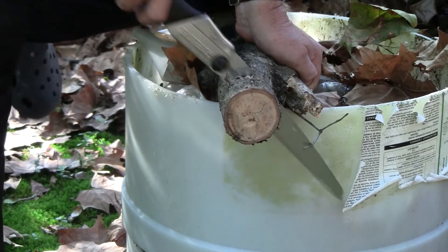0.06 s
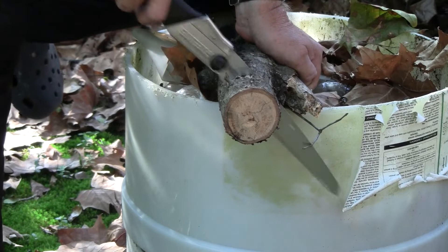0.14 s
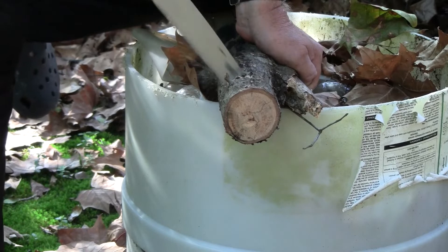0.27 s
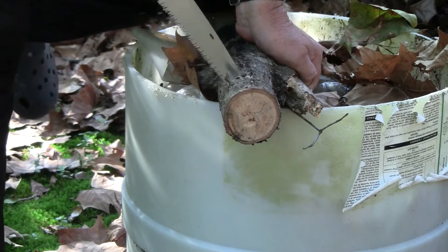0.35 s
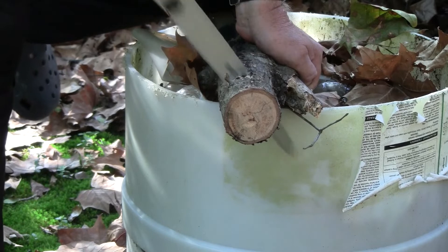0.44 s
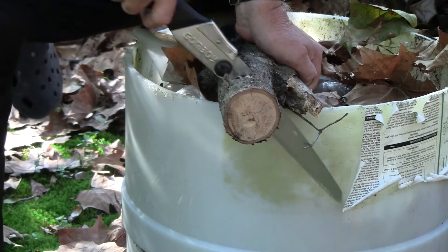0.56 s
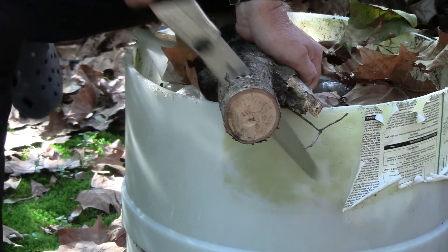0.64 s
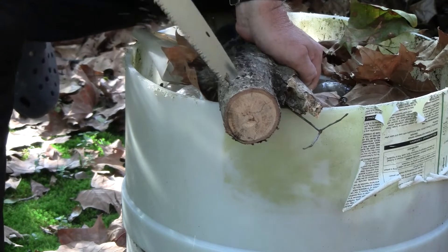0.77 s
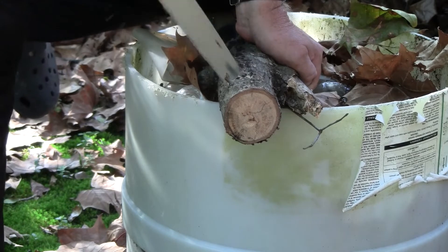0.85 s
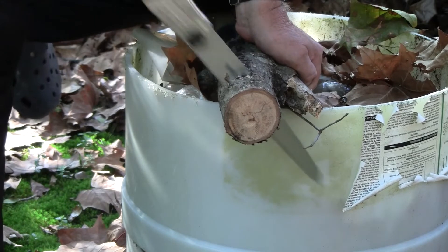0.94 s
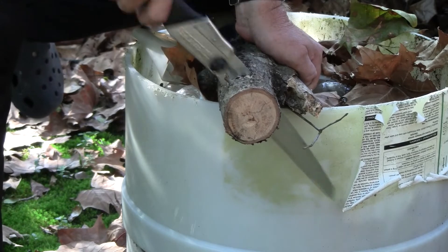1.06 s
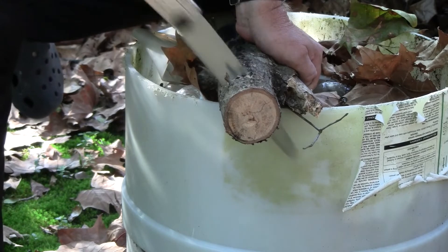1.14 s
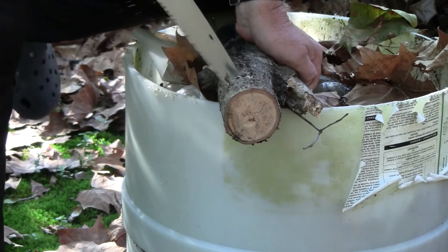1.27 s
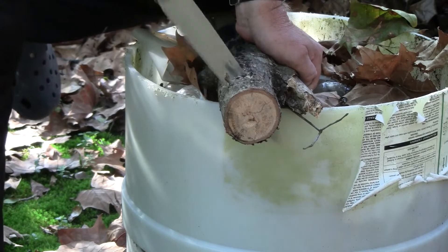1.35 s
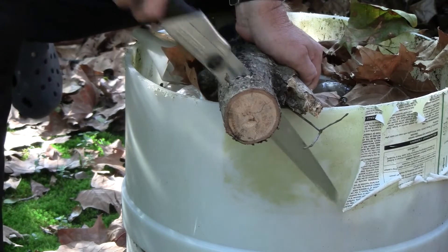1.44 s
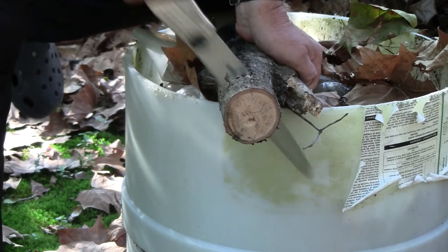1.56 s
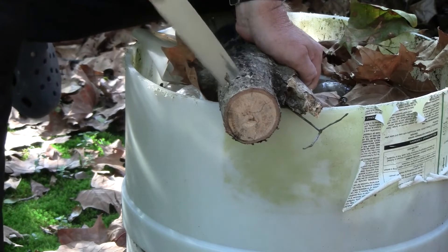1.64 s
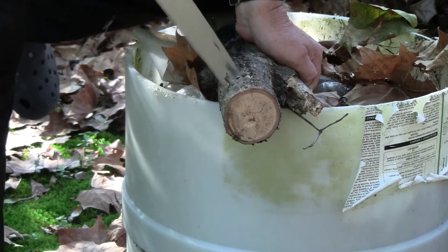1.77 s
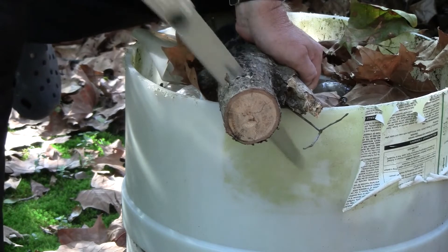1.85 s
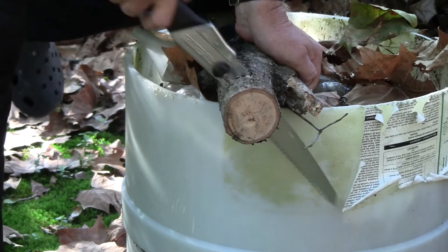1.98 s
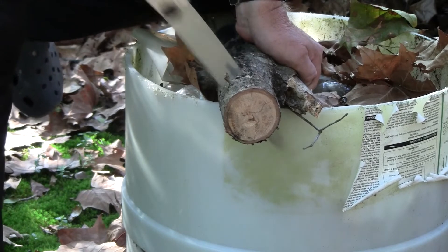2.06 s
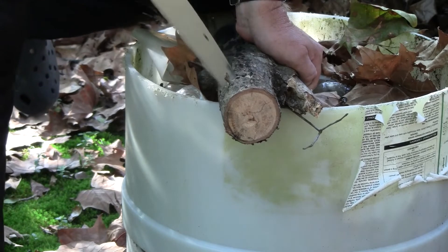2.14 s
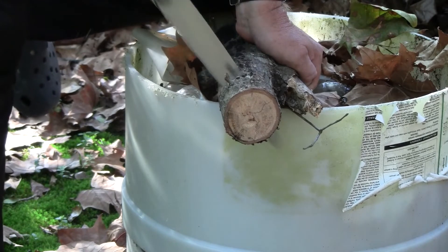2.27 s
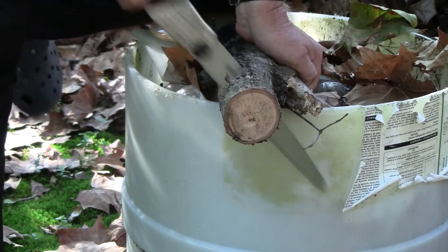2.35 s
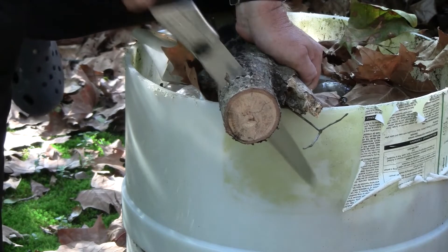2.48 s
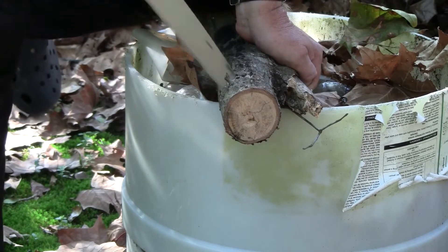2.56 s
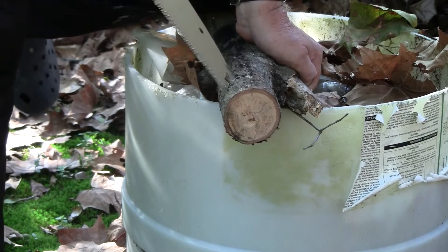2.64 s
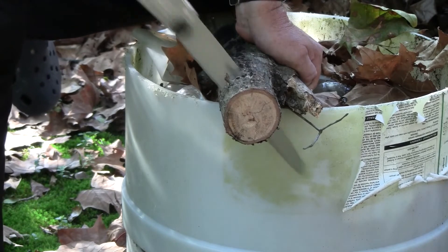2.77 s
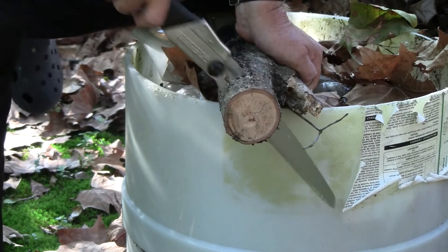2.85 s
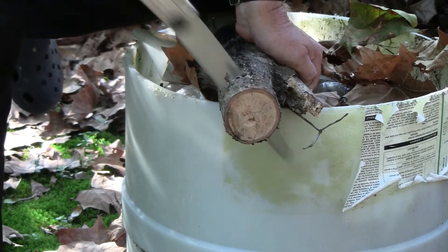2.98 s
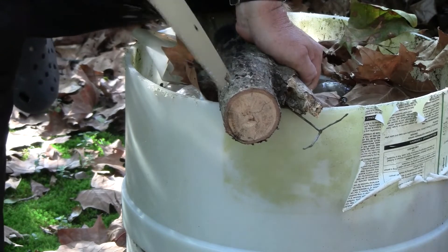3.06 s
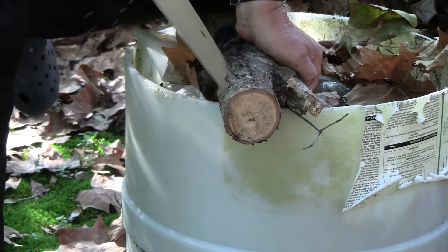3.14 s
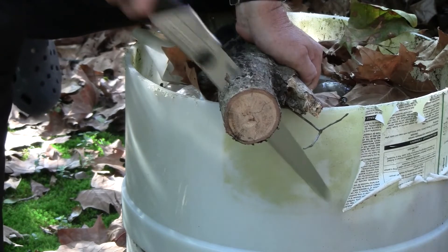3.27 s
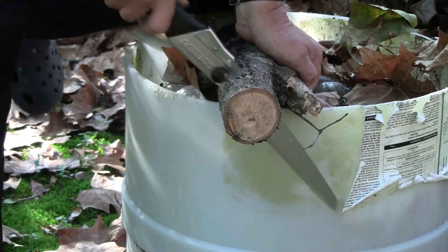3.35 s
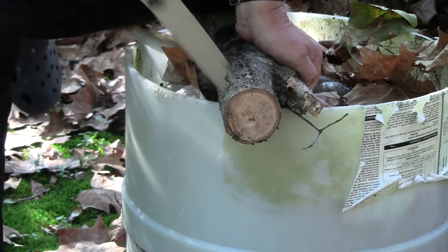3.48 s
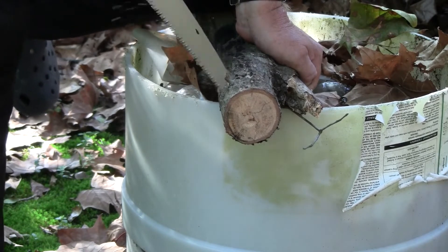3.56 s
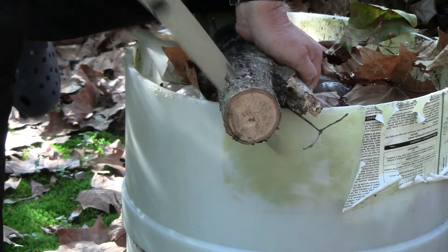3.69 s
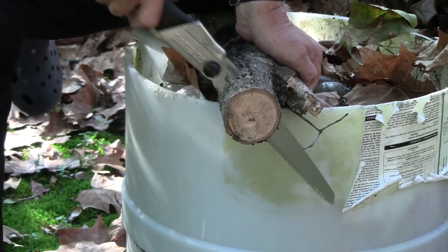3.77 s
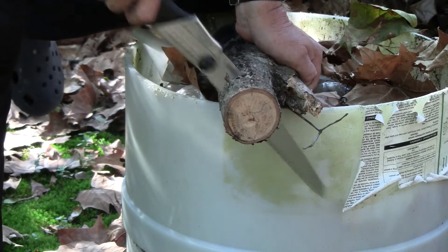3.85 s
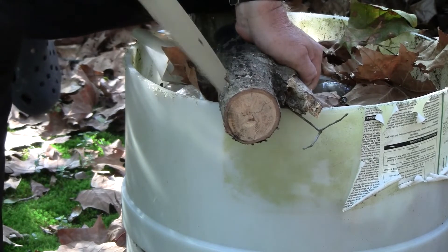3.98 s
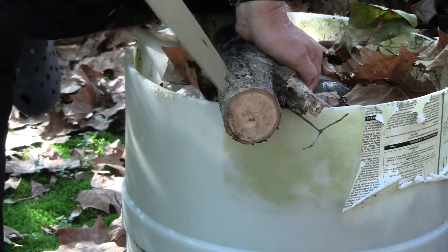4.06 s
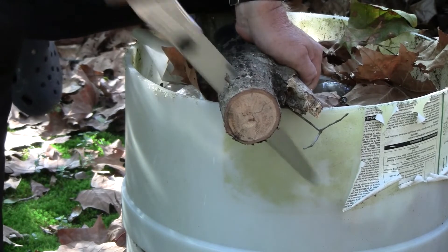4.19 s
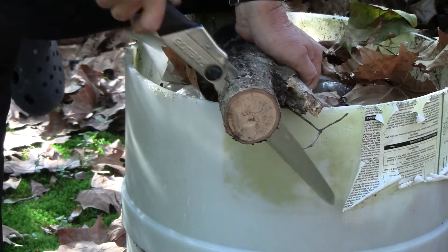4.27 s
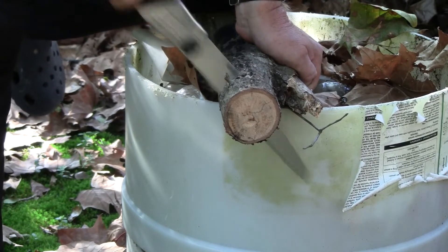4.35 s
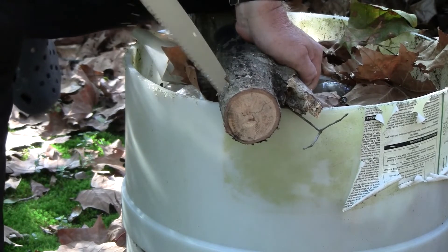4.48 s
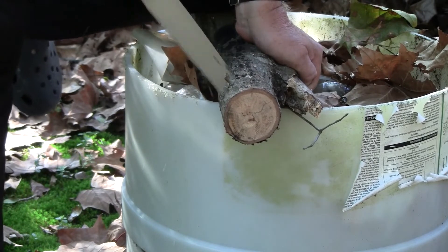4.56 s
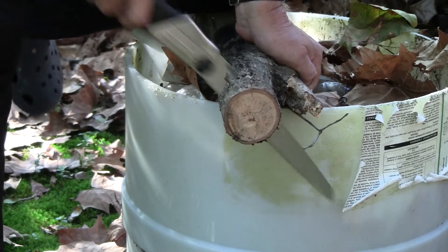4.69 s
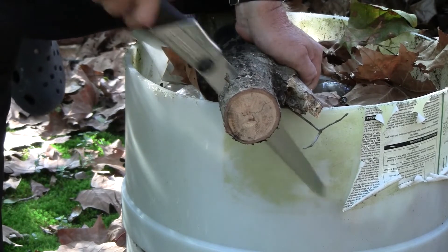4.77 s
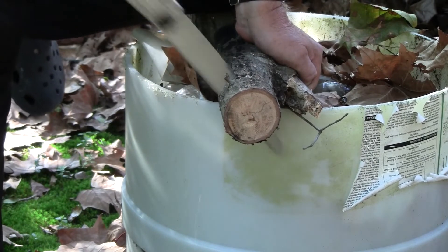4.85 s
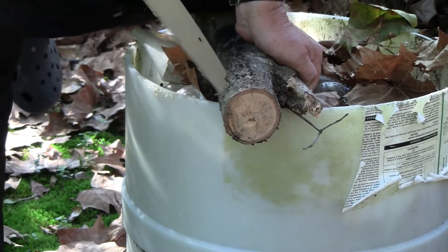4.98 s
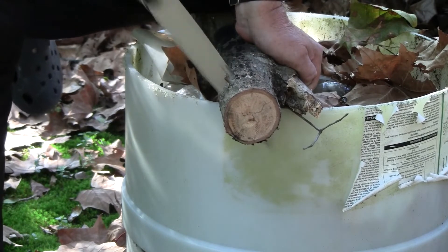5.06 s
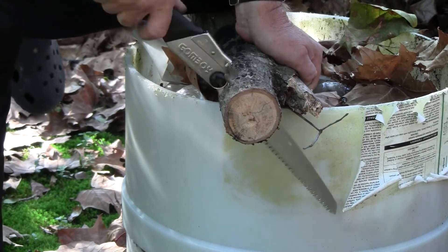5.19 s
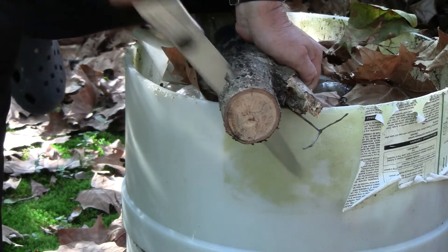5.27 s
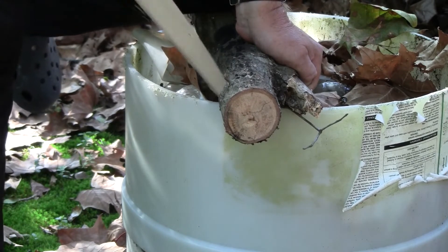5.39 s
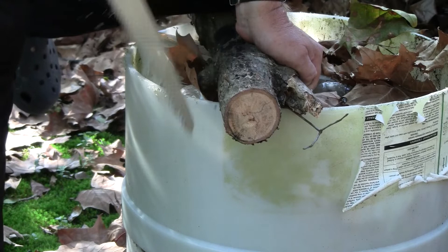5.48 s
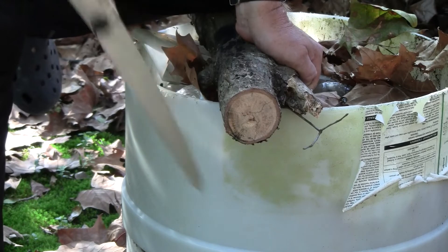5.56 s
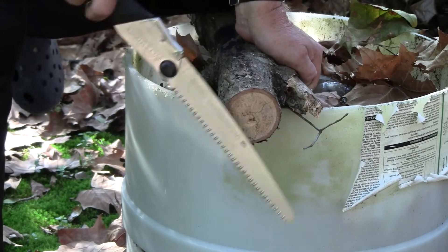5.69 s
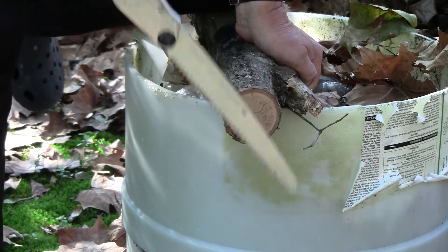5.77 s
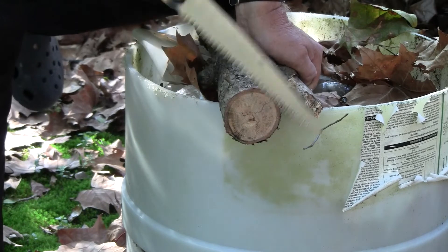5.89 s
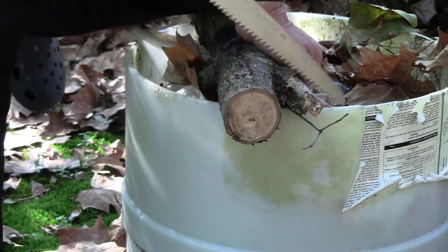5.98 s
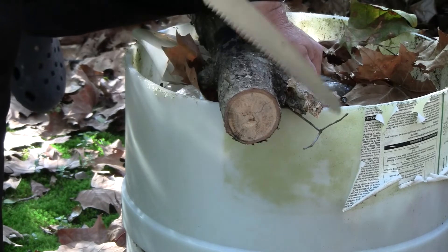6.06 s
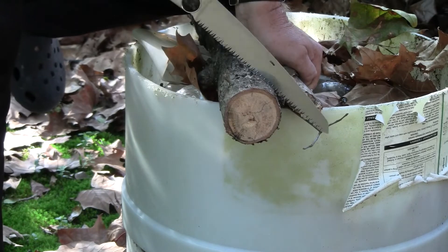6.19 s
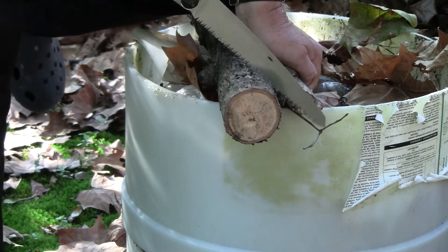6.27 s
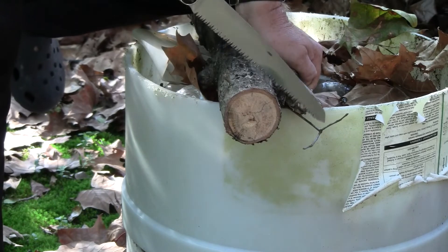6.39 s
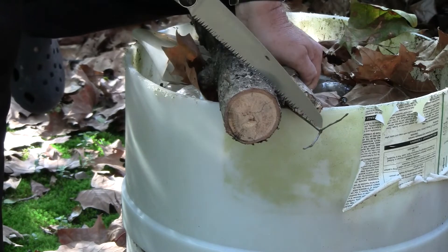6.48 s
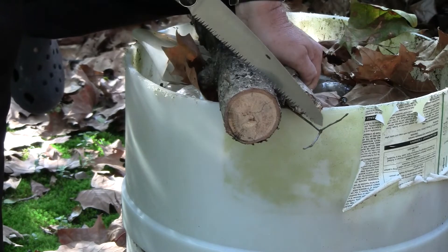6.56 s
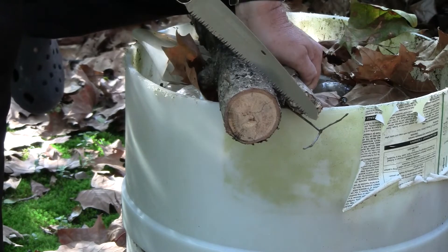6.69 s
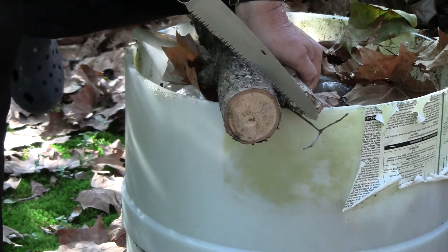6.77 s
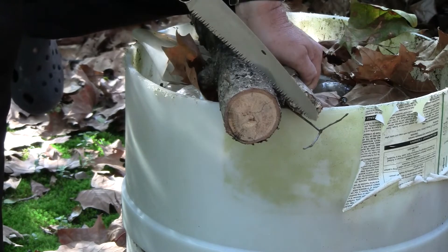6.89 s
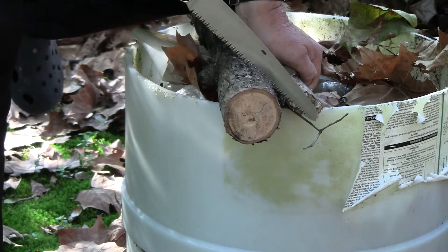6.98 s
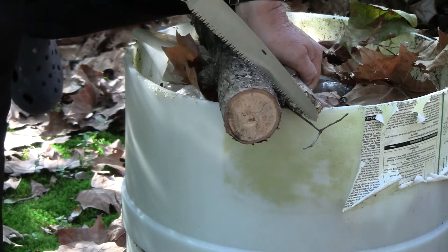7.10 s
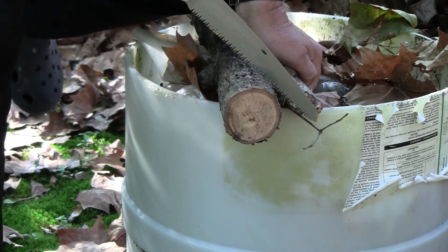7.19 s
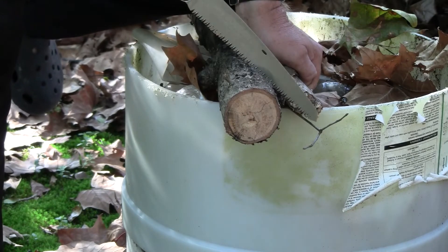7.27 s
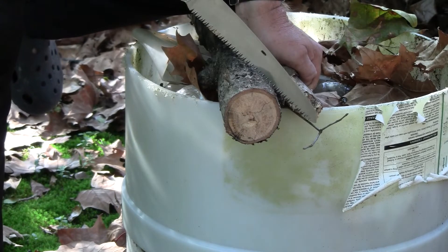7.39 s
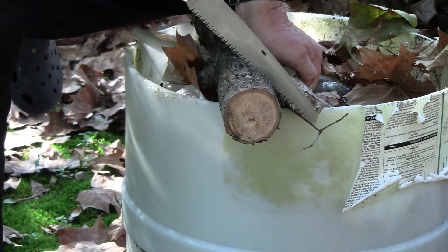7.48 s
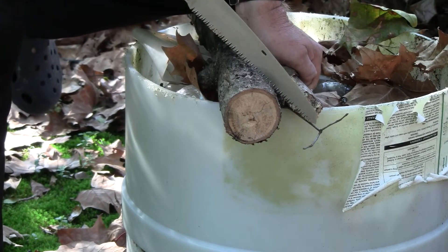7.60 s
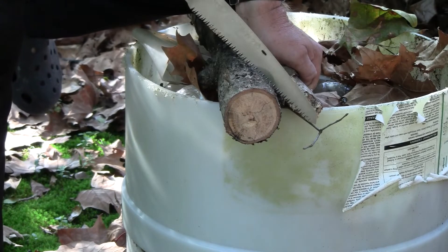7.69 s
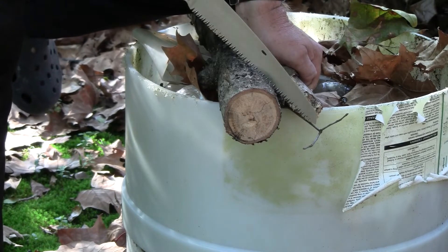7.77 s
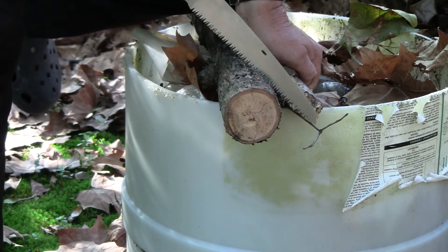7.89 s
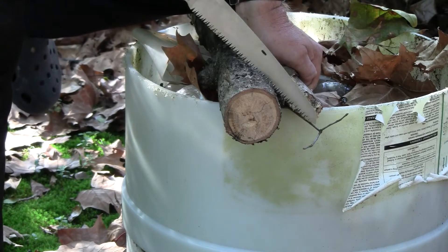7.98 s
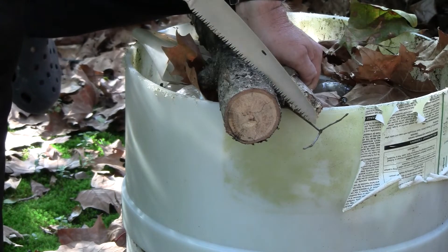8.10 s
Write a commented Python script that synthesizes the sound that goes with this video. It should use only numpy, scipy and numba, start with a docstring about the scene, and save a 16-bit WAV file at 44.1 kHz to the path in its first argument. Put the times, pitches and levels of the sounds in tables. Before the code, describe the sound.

Brisk sawing of small wood, hollow juddering pushes and bright tearing pulls, stops after several seconds, followed by ticks and light knocks outdoors.

```python
"""Pull saw in a small branch

A folding saw cuts a branch held across a plastic bucket in a quiet yard, about two strokes in and out a second.
On the push the teeth skid and shake branch and bucket, heard as resonances driven by tooth impulses; on the pull
they tear fibres, heard as coloured noise, and the free end of the blade rings in its own modes.
The saw is then lifted out, ticks a few times and is set down on the bark for the next cut, among stirring leaves."""
import sys
import numpy as np
from scipy import signal
from scipy.fft import rfft, irfft, next_fast_len
from scipy.io import wavfile
from scipy.ndimage import uniform_filter1d
from numba import njit

SR = 44100
rng = np.random.default_rng(int(sys.argv[2]) if len(sys.argv) > 2 else 0)


def unload_audio(sound):
    """Save the sound as a 16-bit wav file, at the path given as the first command line argument."""
    columns = np.transpose(np.atleast_2d(sound))
    # keep every value between -1 and 1, then stretch to whole-number steps
    steps = np.round(np.clip(columns, -1, 1) * 32767)
    wavfile.write(sys.argv[1], SR, steps.astype(np.int16))


N = 358953
TIME = np.arange(N) / SR
LAST_STROKE_END_S = 5.48


def undb(db):
    """Amplitude ratio of a level: twenty decibels are a factor of ten."""
    return 10 ** (np.asarray(db) / 20)


def unit(x):
    """Normalisation to an rms of 1."""
    return x / np.sqrt(np.mean(x ** 2))


def colour(x, points):
    """Linear filtering in the frequency domain: gain through (hz, level_db) points on a log-frequency axis."""
    hz, db = np.transpose(points)
    size = next_fast_len(N + 4096)
    f = np.maximum(np.fft.rfftfreq(size, 1 / SR), 1)
    gain = undb(np.interp(np.log(f), np.log(hz), db))
    return irfft(rfft(x, size) * gain, size)[..., :N]


def walk(rate):
    """Slow random modulation of rms 1: straight lines between Gaussian values, rate of them a second."""
    knots = rng.standard_normal(8192)
    return unit(np.interp(TIME * rate, np.arange(len(knots)), knots))


@njit
def svf(x, hz, width):
    """Second-order resonance as a state-variable band-pass: moving centre, gain 1 there."""
    y, band, low = np.empty(len(x)), 0., 0.
    for i in range(len(x)):
        g, damping = np.tan(np.pi * hz[i] / SR), width / hz[i]
        v = (band + g * (x[i] + 1e-18 - low)) / (1 + g * (g + damping))
        band, low = 2 * v - band, low + 2 * g * v
        y[i] = damping * v
    return y


def resonate(x, hz, width):
    """A single mode of vibration, of fixed or moving frequency."""
    return svf(x, np.zeros(N) + hz, float(width))


def yard():
    """Diffuse ambience: shared and opposed noise make a wide outdoor rush, with insects far off."""
    # spectrum of the rush: hz, level_db
    rush_spectrum = [(18, -46), (30, -26), (120, -1), (161, -3.5), (301, -3.5), (413, -7), (471, -7),
                     (612, -8), (1060, -13), (1570, -18), (4150, -26), (6480, -29), (7990, -31),
                     (15800, -31.5)]
    mid, side = colour(rng.standard_normal((2, N)), rush_spectrum)
    side = colour(side, [(100, -6.0), (600, 3.5), (3000, -2.5), (10000, -3)]) / np.std(mid)
    # after 5.7 s the rush sinks by 0.94 dB a second
    level_db = -52.5 - 0.94 * np.maximum(TIME - 5.7, 0) + 0.3 * walk(15)
    return (unit(mid) + side * [[1], [-1]]) * undb(level_db) + insects()


def insects():
    """Narrow-band noise: two cascaded resonances, independent in each channel."""
    def one_side():
        return unit(resonate(resonate(rng.standard_normal(N), 8100, 1000), 7760, 1000))

    return np.array([one_side(), one_side()]) * undb(-67.5 + 1.4 * walk(20))


def arm():
    """Reciprocating motion: speed and force of the arm set rasp, shaking, ring, rocking and judder pitch."""
    # one push and pull of the arm: push_start_s, pull_start_s, push_force_db, pull_force_db,
    # judder_hz, push_ring_db, pull_ring_db, rocking_db (levels are relative)
    strokes = [(-.08, 0.138, 2, 1, 333, -3, -0.5, -13), (.381, 0.593, 1.5, 2.5, 330, -1.5, 2, 5),
               (.817, 1.061, 0, 1.5, 325, -2, 2.5, -5), (1.284, 1.522, -1.5, .5, 327, -1.5, 3, 6),
               (1.748, 1.982, 0, 0.5, 290, -2, -1, 5), (2.218, 2.439, -1.5, .5, 363, 1.5, -1, 2),
               (2.676, 2.903, -1.5, 1, 309.7, -1.5, 2.5, -6), (3.13, 3.365, 0, -1.5, 372.3, -3, 3, 7),
               (3.603, 3.831, -1, -2.5, 395, -1, 2.5, -7), (4.064, 4.288, -1, -4, 400.5, -10, -1.5, 6.5),
               (4.529, 4.759, 0, -2, 385, -5, 3.5, 3), (4.991, 5.216, -1, 1.5, 319.5, -1.5, 4, 4)]
    push_s, pull_s, push_db, pull_db, judder_hz, push_ring_db, pull_ring_db, rock_db = np.transpose(strokes)
    turns = np.append(np.column_stack([push_s, pull_s]), LAST_STROKE_END_S)
    phase = np.interp(TIME, turns, np.arange(len(turns)))
    stroke = np.minimum(phase // 2, len(strokes) - 1).astype(int)

    def by_direction(on_push, on_pull):
        """Direction-dependent quantity, blended at the turn."""
        return uniform_filter1d(np.where(phase % 2 < 1, on_push, on_pull) * 1., SR // 20)

    # the lag shifts top speed away from the middle, in shares of a stroke
    swing = phase - by_direction(0.07, -0.0066) * np.abs(np.sin(np.pi * phase))
    turn_speed = 0.18  # share of full speed that still scrapes at each turn
    speed = turn_speed + (1 - turn_speed) * np.abs(np.sin(np.pi * swing))
    force_db = by_direction(push_db[stroke], pull_db[stroke])
    cutting = np.clip((LAST_STROKE_END_S - TIME) / 0.067, 0, 1)  # the last pull lifts out of the kerf
    # the rasp is loudest on the cutting pull and takes a share of the stroke's force
    rasp_db = by_direction(-37, -34) + .3 * force_db
    rasp = cutting * speed ** 1.684 * undb(rasp_db)
    # the wood shakes most on the skidding push, and more as the handle comes near
    nearness_db = -4 * np.cos(np.pi * phase) / 2
    shake_db = by_direction(-22, -28.5) + force_db + nearness_db
    shake = cutting * speed ** 1.294 * undb(shake_db)
    ringing = undb(by_direction(push_ring_db[stroke], pull_ring_db[stroke]))
    rock = undb(rock_db[stroke] - force_db)
    return phase, rasp, shake, ringing, rock, judder_hz[stroke]


def teeth(speed, nominal_rate_hz=240, jitter=.3, scatter_db=2.0, bite_s=0.0022):
    """Impulsive excitation: teeth pass at a rate set by blade speed, strike unevenly and tear for a moment."""
    rate_hz = nominal_rate_hz * (.3 + .7 * speed) * np.exp(jitter * walk(250))
    count = np.floor(np.cumsum(rate_hz) / SR)
    strikes = np.diff(count, prepend=0) * undb(scatter_db * np.clip(walk(400), -2, 1))
    bite = signal.lfilter([1], [1, -np.exp(-1 / (bite_s * SR))], strikes)
    return unit(strikes), unit(bite)


def tear_fibres(bite, rasp):
    """Modulated noise: each bite tears fibres, unevenly with harder and softer grain."""
    grain = undb(1.1 * walk(70))
    torn = rng.standard_normal((2, N)) * (1.54 + bite) * grain * undb(1.0 * walk(900))
    return unit(torn) * rasp


def knocks(times, db, contact_s):
    """Blunt impact: force rises to its peak at the contact time, then dies; db sets the pulse energy."""
    hits, t = np.zeros(N), TIME[:SR // 50]
    hits[(times * SR).astype(int)] = undb(db)
    push = t * np.exp(-t / contact_s)
    return signal.fftconvolve(hits, push / np.linalg.norm(push))[:N]


def catches():
    """Impulsive contact: a tooth catches hard and jolts the branch."""
    # hard catches: start_s, level_db (relative)
    catch_list = [(0.047, -9.5), (0.48, -10), (0.981, -15), (1.354, -13.5), (1.581, -15), (1.96, -9.5),
                  (2.028, -18.5), (2.271, -17), (2.753, -12.5), (3.223, -17.5), (3.284, -19), (3.35, -12.5),
                  (3.393, -17), (3.724, -12.5), (3.758, -15), (4.18, -11.5), (4.205, -14), (5.206, -15.5)]
    return knocks(*np.transpose(catch_list), contact_s=0.00015)


def snags(shake):
    """Random impulses: teeth snag at chance moments, harder where the wood shakes more."""
    per_second, level_db, spread_db = 13, 1.5, 4
    chance = rng.random((int(per_second * LAST_STROKE_END_S), 2))
    db = level_db + spread_db * (2 * chance[:, 1] - 1)
    return knocks(chance[:, 0] * LAST_STROKE_END_S, db, contact_s=0.00014) * shake


def body(push, pull):
    """Modal response of branch and bucket: the direction of the force decides which modes speak."""
    # modes of branch and bucket: pitch_hz, width_hz, push_level_db, pull_level_db (relative)
    wood_modes = [(83.6, 23, -27, -5), (117, 24, -13.5, 3), (150, 29, -5.5, -2.5), (187.9, 13, 1.5, -2.5),
                  (250.6, 19.5, -2.5, 2), (271.8, 14.2, 0.5, -1), (329.8, 35.5, 1.5, -8.5),
                  (360.4, 18.3, 2.5, -3.5), (407.6, 28.7, 1, 2.5), (486.6, 18.5, -5, -6),
                  (520.6, 28, -8, -5.5), (616, 29, -7.5, -5.5), (694, 30, -1.5, -3), (778.7, 24.5, -2, -5),
                  (859.5, 49, -4, -3.5), (995, 43, -7.5, -17), (1173, 150, -14, -28),
                  (1266, 37, -2.5, -7.5), (1386, 79, -12, -14.5), (1582, 45, -2.5, -5.5),
                  (1852, 78, -12.5, -22)]
    out = np.zeros(N)
    for k, (hz, width_hz, push_db, pull_db) in enumerate(wood_modes):
        drive = push * undb(push_db) + pull * undb(pull_db)
        out += (-1) ** k * resonate(drive, hz, width_hz)  # neighbours in opposite polarity
    return colour(out, [(35, -36), (62, -2.5), (105, 1.5), (1900, -7.5), (4000, -14)])


def shaken_wood(strikes, bite, shake, depth, pushing, rock, judder_hz):
    """Forced vibration: skidding teeth make the branch judder, and the pull rocks the bucket."""
    force = unit(strikes + 0.33 * bite * rng.standard_normal(N)) * shake * undb(14.0)
    pull_force = force * (1 - pushing)
    # the long lever at the start of a pull rocks the whole bucket
    rocking = resonate(pull_force * depth ** 1.7 * rock, 116, 49.4)
    jolts = (catches() + snags(shake)) * undb(22.0)
    skid = force * pushing + jolts
    judder = resonate(skid, judder_hz, 57) * undb(1.5)
    return body(skid + judder, (pull_force + rocking) * undb(3.0))


def blade(force, bend=1):
    """Free decay of steel modes: the blade rings on after each impulse; bending detunes it."""
    # the free end of the blade: pitch_hz, level_db (relative), t60_s
    steel_modes = [(2805, -18, .07), (4872, 0, .15), (5787, -4, .14), (7620, -16, .05), (8710, -23, .05),
                   (9620, -22, .09), (12769, -18, .08)]
    out = np.zeros(N)
    for hz, db, t60_s in steel_modes:
        width_hz = np.log(1000) / np.pi / t60_s
        out += undb(db) * resonate(force, hz * bend, width_hz)
    return out


def blade_ring(tearing, depth, ringing):
    """Contact damping: the blade rings while out of the kerf and is choked as the handle comes near."""
    free = np.clip((.8 - depth) / 0.54, 0, 1) * ringing * undb(1.05 * walk(11))
    leaving = np.clip((LAST_STROKE_END_S - TIME) / 0.14, 0, 1)  # the last pull lifts off and barely rings
    return blade(tearing * free * leaving, 1 + 0.0021 * walk(70)) * undb(26.0)


def span_chirp(tearing, depth, pushing):
    """Shortening resonator: the span from handle to wood rises in pitch with depth, mostly on the push."""
    wandering_depth = depth - .64 + 0.044 * walk(30)  # the contact shifts
    span_hz = 4870 + 4660 * np.maximum(wandering_depth, 0)
    contact_db = 5 * pushing + 4.0 * np.tanh(walk(45))
    contact = np.clip((depth - .4) / 0.28, 0, 1) * undb(contact_db)
    return resonate(tearing * contact, span_hz, 160) * undb(8.5)


def along_blade(x, depth, handle_s=.0031, tip_s=.0047, echo_db=-3.5):
    """Comb interference: waves return from handle and tip over changing lengths, so fine resonances slide."""
    from_handle = np.interp(TIME - handle_s * (1 - 0.392 * depth), TIME, x)
    from_tip = np.interp(TIME - tip_s * (1 + 0.1547 * depth), TIME, x)
    echo = undb(echo_db)
    return (x + echo * (from_handle - from_tip)) / np.sqrt(1 + 2 * echo ** 2)


def sawing():
    """Friction in the kerf excites rasp, shaking wood and ringing steel; gives direct and scattered sound."""
    # spectrum of tearing fibres: hz, level_db (relative)
    fibre_spectrum = [(400, -13), (900, 8), (1900, 6), (2400, 2.5), (3000, 3.5), (4200, -2.5), (5200, 4.5),
                      (6300, 4), (7000, 0.5), (9000, -3.5), (10200, 1.5), (11500, -4), (13000, 0.5),
                      (15800, -2.5)]
    phase, rasp, shake, ringing, rock, judder_hz = arm()
    depth = (1 - np.cos(np.pi * phase)) / 2  # 1 = in to the handle
    pushing = uniform_filter1d((phase % 2 < 1) * 1., SR // 50)
    strikes, bite = teeth(np.abs(np.sin(np.pi * phase)))
    tearing = tear_fibres(bite, rasp)
    hiss = colour(tearing, fibre_spectrum) * undb(1.5)
    wood = shaken_wood(strikes, bite, shake, depth, pushing, rock, judder_hz)
    ring = blade_ring(tearing[0], depth, ringing)
    chirp = span_chirp(tearing[0], depth, pushing)
    return wood + ring + chirp + along_blade(hiss[0], depth), along_blade(hiss[1], depth)


def blows(times, db, decay_s):
    """Exponential decay: short scrapes of dying noise, each with the energy that its db gives."""
    out, t = np.zeros(N), TIME[:SR // 20]
    for s, gain in zip(times, undb(db)):
        burst = rng.standard_normal(len(t)) * np.exp(-t / decay_s)
        i = int(s * SR)
        out[i:i + len(t)] += gain * burst / np.linalg.norm(burst)
    return out


def bark_touches():
    """Impact on coupled bodies: teeth tap the bark with a dull thump and a faint ring."""
    # teeth leave the kerf and are set down again: start_s, thump_level_db, ring_level_db (relative)
    touch_list = [(5.468, -30.5, -58), (6.137, -27, -46), (6.153, -36, -64), (6.253, -51, -38.5),
                  (6.296, -34.5, -47), (6.449, -37.5, -44.5), (6.603, -37.5, -48), (6.622, -40, -50),
                  (6.672, -48, -51), (6.701, -34.5, -62), (7.06, -50, -54), (7.33, -36.5, -40.5)]
    s, thump_db, ring_db = np.transpose(touch_list)
    blunt = knocks(s, thump_db, contact_s=0.00022) * undb(21.5)
    scrape = blows(s, thump_db, decay_s=0.0087) * undb(27.0)
    thump = blunt + scrape
    tap = blows(s, ring_db, decay_s=0.0048)
    return body(thump, 0.75 * thump) + blade(tap) * undb(36.0) + tap * undb(13.0)


def lift_ticks():
    """Transient noise: dry ticks of a few milliseconds as the saw is lifted."""
    # ticks: start_s, level_db (relative)
    tick_list = [(5.6325, -40), (5.7313, -36), (5.7573, -31), (5.7807, -30), (5.796, -23.5), (5.8271, -39),
                 (5.8495, -42)]
    ticks = blows(*np.transpose(tick_list), decay_s=0.0029)
    tone = [(300, -15), (2000, -7), (4500, 2.5), (7000, 1), (10000, -3.5), (15000, -8)]
    return colour(ticks, tone) * undb(11.0)


def leaves():
    """Amplitude-modulated band noise: a faint, uneven rustle as dry leaves stir."""
    # middle of each stir: peak_s, level_db
    rustle_list = [(5.75, -66), (6.1, -69), (6.75, -67), (8.0, -64.5)]
    rustle = resonate(resonate(rng.standard_normal(N), 3300, 1500), 3300, 1500)
    swell_s = 0.087  # time constant of rise and fall
    swells = sum(undb(db) * np.exp(-np.abs(TIME - s) / swell_s) for s, db in rustle_list)
    return unit(rustle * undb(4.0 * walk(60))) * swells


def scene():
    """Direct and scattered sound: the saw is close and nearly centred; hiss also scatters off leaves and bucket."""
    # where the saw sits between the microphones: hz, left_minus_right_db
    balance = [(110, 0.8), (200, 2.5), (400, 3.5), (900, 2.5), (1300, 0.6), (2200, 2), (3500, -0.5),
               (6500, 2), (8500, -1), (10000, -4), (11200, -1), (13000, 1), (15000, 2)]
    # hiss that arrives by other paths: hz, level_db
    scatter_spectrum = [(500, -24), (2200, -28), (4000, -32), (5500, -11), (7000, -11.5), (9100, -4.5),
                        (10200, -13), (11500, -20), (12500, -17.5), (14500, -10.5)]
    direct, scattered = sawing()
    direct = direct + bark_touches() + lift_ticks() + leaves()
    left = colour(direct, [(hz, db / 2) for hz, db in balance])
    right = colour(direct, [(hz, -db / 2) for hz, db in balance])
    side = colour(scattered, scatter_spectrum)
    return np.array([left + side, right - side]) + yard()


def record(dry):
    """Band limitation: a steep elliptic low-pass cuts the top."""
    top_hz = 15850
    return signal.sosfilt(signal.ellip(10, .2, 70, top_hz, fs=SR, output="sos"), dry)


dry = scene()
out = record(dry)
unload_audio(out)
```